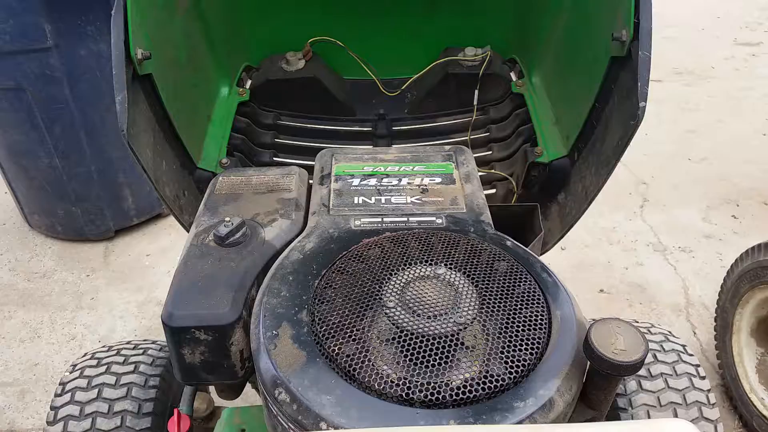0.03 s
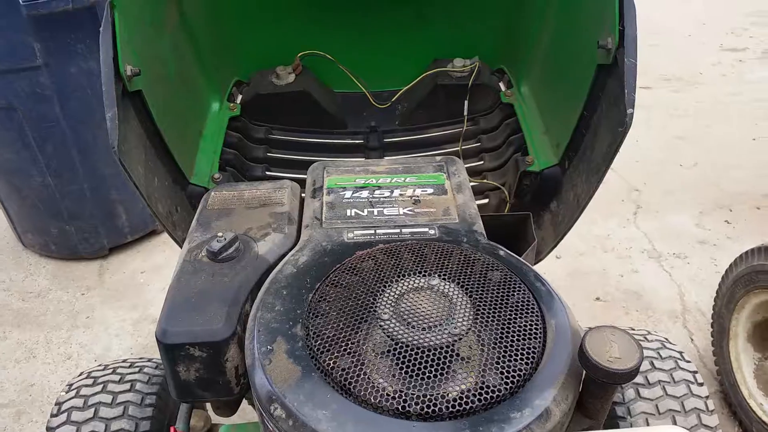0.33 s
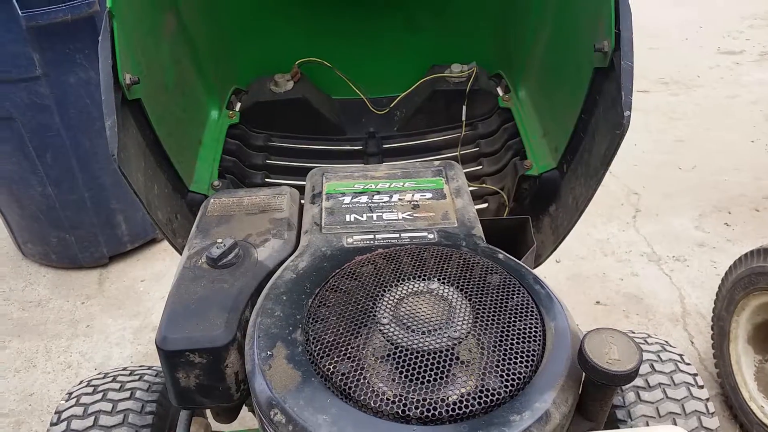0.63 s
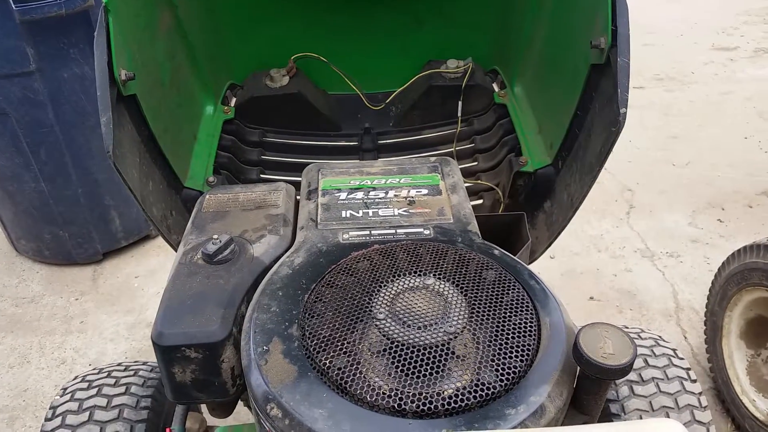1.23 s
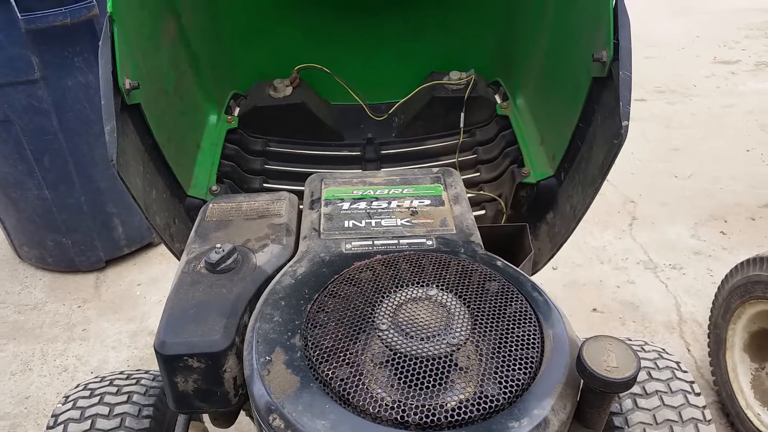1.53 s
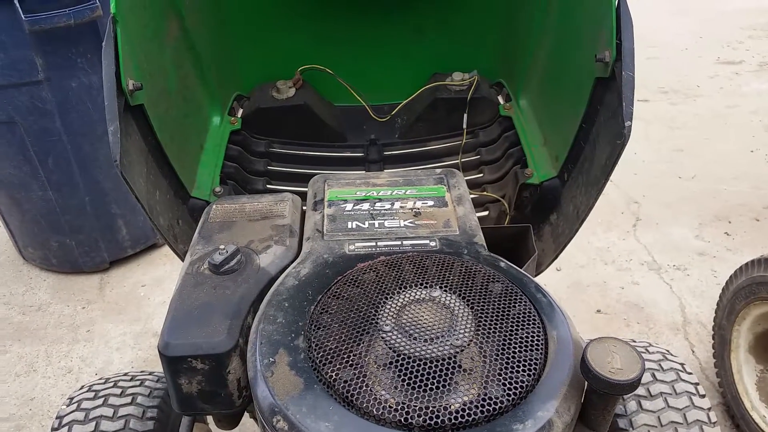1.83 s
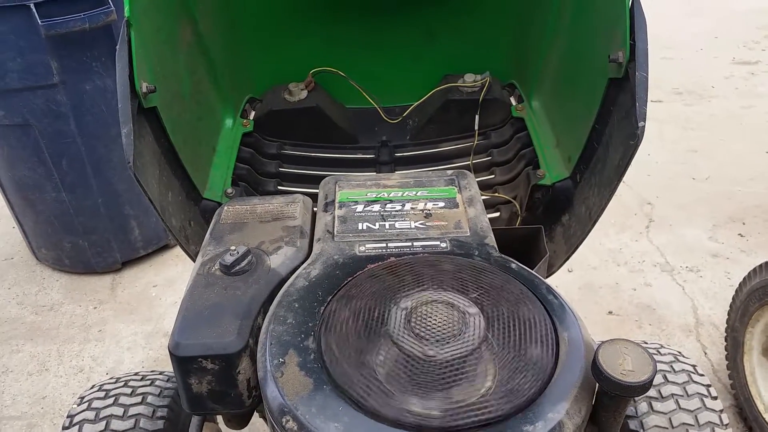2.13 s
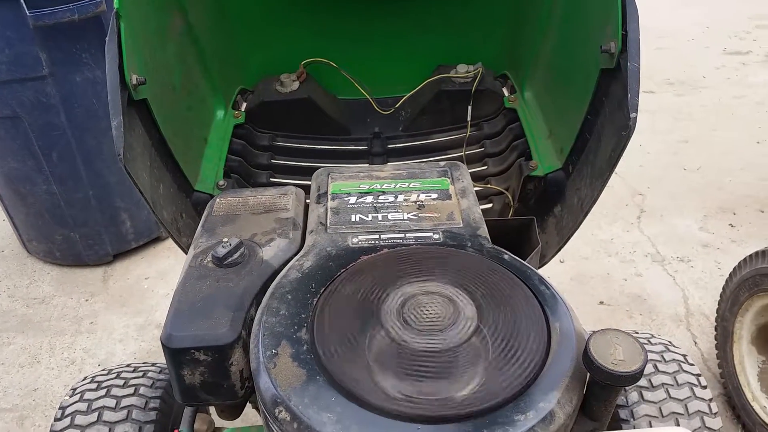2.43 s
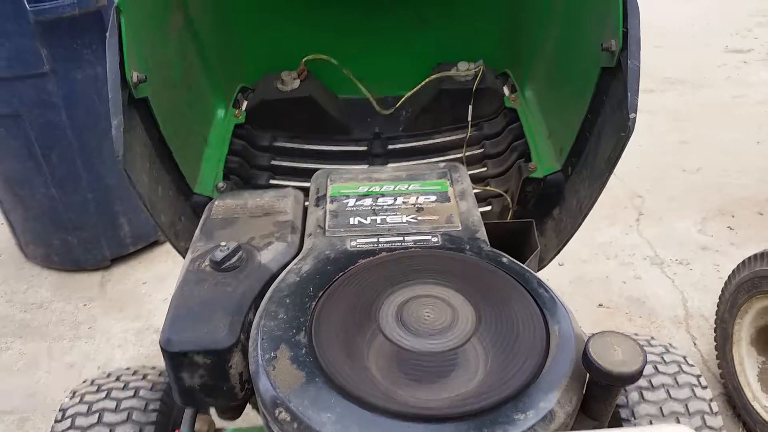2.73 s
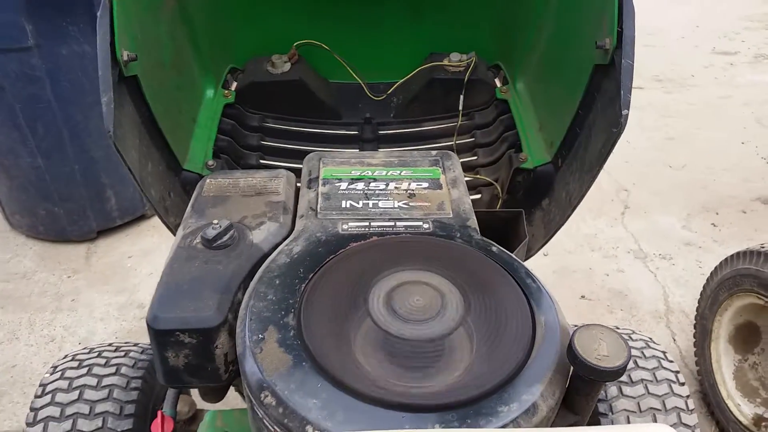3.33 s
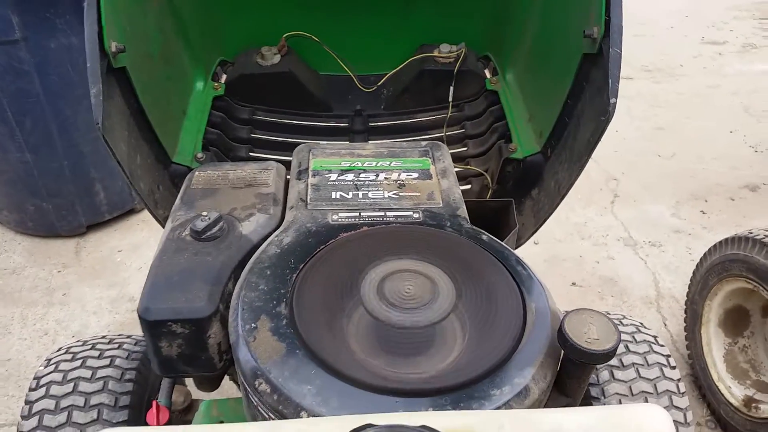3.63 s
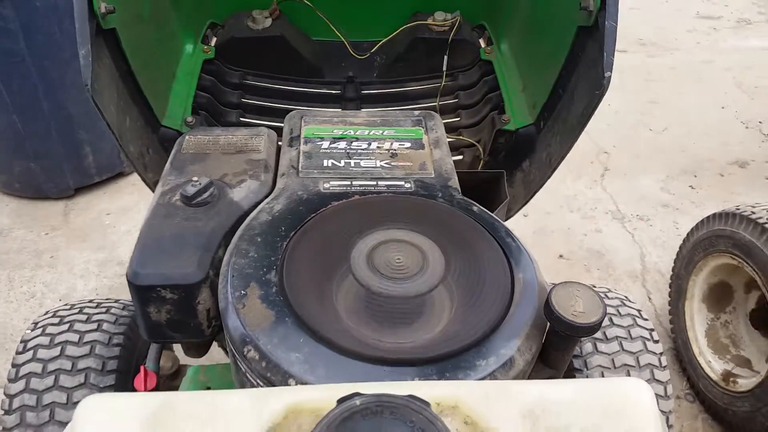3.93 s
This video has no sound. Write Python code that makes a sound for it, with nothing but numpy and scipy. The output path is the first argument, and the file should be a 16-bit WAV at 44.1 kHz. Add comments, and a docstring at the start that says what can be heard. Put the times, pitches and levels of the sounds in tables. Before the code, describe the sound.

A small petrol mower engine starts after a few knocks, then chugs in a garage.

```python
"""A single-cylinder riding mower starts up in a garage, heard from just above the engine.
First the controls knock and rustle over a low rumble. The starter's small gear clunks in, grinds on
the flywheel and squeals as it slips. Then the engine catches, speeds up and settles at about 22 firings
a second. Each firing thumps the muffler, barks and rattles the engine cover; between firings the
engine gulps air and its valves tick. The garage adds a short, dull echo."""
import sys
import numpy as np
from scipy import signal
from scipy.fft import rfft, irfft
from scipy.io import wavfile

SR = 44100
rng = np.random.default_rng(int(sys.argv[2]) if len(sys.argv) > 2 else 0)


def waveform_to_disk(signal):
    """Save audio, clipped to [-1, 1], as 16-bit WAV at the path in sys.argv[1]."""
    frames = np.transpose(np.atleast_2d(signal))
    scaled = np.clip(frames, -1, 1) * 32767
    samples = np.round(scaled).astype(np.int16)
    wavfile.write(sys.argv[1], SR, samples)


N = 176400
TIME = np.arange(N) / SR
FREQ = np.maximum(np.arange(N // 2 + 1) * SR / N, 1)

# A tone colour says how strong low and high sounds are next to each other.
# A ring time is how long a note takes to fade by 60 dB.
# A fade time is how long a hit takes to drop to about a third.
# A half-width is how long a swell takes to drop from its peak to about 60 percent.

# Tone colour of the background rumble. Each row: frequency in Hz, level in dB.
RUMBLE_COLOUR = [(20, -38), (53, 3.5), (107, -2.5), (241, -8), (486, -18), (900, -21), (2090, -27.5),
                 (2600, -35), (3990, -20), (5820, -38), (7220, -37), (8730, -61), (11700, -30.5),
                 (15800, -43)]
# The rumble fading in. Each row: time in seconds, level in dB.
RUMBLE_LEVEL = [(.39, -110), (.425, -63), (.52, -50.5), (.68, -41.5), (2.19, -41.7)]
# How alike noise is on the left and right. Each row: frequency in Hz, likeness from 0 to 1.
STEREO_LIKENESS = [(60, 0.92), (300, 0.82), (700, 0.72), (1400, 0.35), (3000, 0.036), (15000, 0.031)]
# Balance of the two microphones. Each row: frequency in Hz, left minus right in dB.
MIC_LEAN = [(40, -7.5), (100, 1.5), (500, 3), (800, 5.5), (1200, 8), (2000, 13.5), (3400, 15), (5500, 22),
            (7400, 19), (9200, 2), (11800, -16), (15000, -3.5)]

# Knocks of the controls. Each row: start in seconds, level in dB, fade time in seconds.
CONTROL_KNOCKS = [(.655, -44.5, 0.0057), (.739, -24.5, 0.0081), (.961, -33, 0.016), (1.003, -24, 0.016),
                  (1.034, -21, 0.0067), (1.24, -27, 0.0058), (1.377, -35.5, 0.01), (1.402, -40, 0.027),
                  (1.466, -26.5, 0.0082), (1.695, -42, 0.033), (1.725, -28, 0.0055), (1.788, -40.5, 0.047),
                  (1.846, -35, 0.0057)]
# Tone colour of those knocks. Each row: frequency in Hz, level in dB.
KNOCK_COLOUR = [(100, -0.5), (300, -5), (520, -0.5), (750, 1), (1100, -1), (1550, 1.5), (2300, -5.5),
                (3200, -18.5), (5000, -17), (7200, -35), (9000, -62), (12000, -23), (15800, -32)]
# Notes of the control panel. Each row: pitch in Hz, relative level in dB, ring time in seconds.
PANEL_NOTES = [(378, 0, 0.17), (518, 0, 0.14), (1110, -8, 0.045), (1510, 1, 0.031)]
# Notes of a snapping lever. Each row: pitch in Hz, relative level in dB, ring time in seconds.
LEVER_NOTES = [(1220, 1.5, 0.0077), (1570, 2, 0.013), (2130, -5.5, 0.0087)]
# Short scrapes and rustles. Each row: peak time in seconds, level in dB, half-width in seconds.
SCRAPE_SWELLS = [(1.019, -43.5, 0.0057), (1.043, -27, 0.0042), (1.054, -48, 0.037), (1.32, -51.5, 0.026),
                 (1.467, -45.5, 0.0023), (1.566, -48, 0.0062), (1.638, -41.5, 0.012),
                 (1.844, -42.5, 0.0013)]
# Tone colour of the scrapes. Each row: frequency in Hz, level in dB.
SCRAPE_COLOUR = [(1000, -5), (2400, 0), (3400, -3), (5000, 6), (7300, -5.5), (9000, -18.5), (12000, 6.5),
                 (15800, -10)]
# Dull thuds of the frame. Each row: peak time in seconds, level in dB, half-width in seconds.
FRAME_THUDS = [(0.667, -34.5, 0.011), (0.976, -34, 0.0084), (1.314, -37.5, 0.017), (1.477, -36.5, 0.02),
               (1.743, -40.5, 0.03), (1.853, -33.5, 0.0086), (2.709, -26, 0.017), (2.78, -29.5, 0.013)]
# Notes of the frame. Each row: pitch in Hz, relative level in dB, ring time in seconds.
FRAME_NOTES = [(170, -5, 0.05), (278.3, 2, 0.074), (375, -0.5, 0.049), (489, -2.5, 0.039)]
# Booms of the bodywork. Each row: peak time in seconds, level in dB, half-width in seconds, pitch in Hz.
BODY_BOOMS = [(1.023, -24, .006, 520), (1.052, -28, .008, 330), (2.227, -20, .007, 700),
              (2.27, -22, .026, 370), (2.377, -26, .005, 520)]

# The starter's switch closes and its gear slams in.
# Each row: start in seconds, level in dB, fade time in seconds.
CLUNK_HITS = [(2.197, -23.5, 0.0097), (2.21, -12, 0.0071), (2.217, -11.5, 0.011)]
# Tone colour of that clunk. Each row: frequency in Hz, level in dB.
CLUNK_COLOUR = [(59, -49), (100, -7.5), (687, -3.5), (1200, -7), (2160, -5.5), (4070, -7.5), (7220, -16.5),
                (8920, -31), (12500, -8), (15800, -25)]
# Notes of the engine's metal. Each row: pitch in Hz, relative level in dB, ring time in seconds.
METAL_NOTES = [(422.7, -3, 0.13), (450, 0, 0.12), (501, -2, 0.16), (638.4, 0.5, 0.16), (721.5, 1, 0.18),
               (1005, -3.5, 0.36), (1157, 4, 0.1), (1328, 5.5, 0.18), (1562, 8, 0.099), (1645, 4.5, 0.18),
               (2025, -1, 0.1)]
# Loudness of the starter. Each row: time in seconds, overall gear level in dB, rasp level in dB.
STARTER_LEVELS = [(2.205, -60, -70), (2.225, -27.5, -36), (2.295, -20, -29), (2.318, -30, -33),
                  (2.345, -20.5, -33), (2.385, -26, -24), (2.43, -29, -27), (2.55, -28.5, -24),
                  (2.64, -30, -21.5), (2.69, -54, -42)]
# How fast the gear teeth meet. Each row: time in seconds, teeth per second.
TOOTH_SPEED = [(2.2, 225), (2.29, 510), (2.33, 493), (2.42, 625), (2.49, 650), (2.56, 520), (2.7, 830)]
# Tone colour of the grinding gears. Each row: frequency in Hz, level in dB.
GRIND_COLOUR = [(100, -25), (220, -1.5), (400, -3.5), (940, -1), (1650, 3), (1890, 1), (6670, -20.5),
                (8820, -62), (15800, -48)]
# Tone colour of the starter gear's high rasp. Each row: frequency in Hz, level in dB.
RASP_COLOUR = [(2500, -12.5), (4300, -1), (5100, -4.5), (7000, 1), (7900, -15), (10500, -9.5), (12500, -2),
               (13800, -10.5), (15800, -11)]
# The starter's case singing under load.
# Each row: peak time in seconds, level in dB, half-width in seconds, pitch in Hz.
CASE_TONES = [(2.3, -23.5, 0.011, 1653), (2.38, -23, 0.024, 1650), (2.55, -25.5, 0.015, 1616)]
# Notes of the slipping starter gear. Each row: pitch in Hz, relative level in dB, ring time in seconds.
GEAR_NOTES = [(4240, -2, 0.017), (5740, 3, 0.05), (5970, 1, .04), (6400, -1, 0.0087), (12370, 4.5, .025),
              (12090, 2, 0.018)]
# Squeals of that gear. Each row: peak time in seconds, level in dB, pitch in Hz, half-width in seconds.
GEAR_SQUEALS = [(2.356, -16.5, 6100, 0.0037), (2.376, -23, 6950, .004), (2.432, -18, 6020, 0.0028),
                (2.472, -24, 6150, 0.0041), (2.495, -19.5, 5860, 0.0031), (2.55, -22, 5650, 0.0047)]

# Engine speed. Each row: time in seconds, firings per second.
ENGINE_SPEED = [(2.618, 8.77), (2.732, 11.96), (2.816, 14.16), (2.886, 16.42), (2.947, 18.18),
                (3.002, 19.72), (3.101, 21.83), (3.234, 23.45), (3.32, 23.0), (3.408, 22.0), (3.634, 22.15),
                (3.914, 21.72)]
# Strength of the firings. Each row: time in seconds, relative level in dB.
FIRING_STRENGTH = [(2.62, -2.5), (2.74, -1.5), (2.9, 1.5), (3.2, 1), (3.6, -0.5), (4, 0)]
# Weak firings. Each row: time in seconds, change of level in dB.
WEAK_FIRINGS = [(3.454, -3), (3.726, -2), (3.909, -2)]
# Tone colour of the fan and moving parts. Each row: frequency in Hz, level in dB.
FAN_COLOUR = [(150, -5.5), (250, 1.5), (354, -8), (680, -6), (850, -11), (1130, -10.5), (2040, -9),
              (3260, -16), (7240, -16), (9070, -28), (12800, -12.5), (15800, -33)]
# Tone colour of the shaking frame. Each row: frequency in Hz, level in dB.
SHAKE_COLOUR = [(30, -37), (70, 8), (150, 4), (270, -4), (400, -12.5), (1500, -65)]
# Loudness of the fan and the shaking. Each row: time in seconds, level in dB.
CHURN_LOUDNESS = [(2.52, -66), (2.6, -31.5), (2.72, -30.5), (2.9, -24.5), (4, -24)]
# Valve and piston knocks. Each row: fraction of the way to the next firing, relative level in dB.
VALVE_KNOCKS = [(0.168, -1.5), (.42, -5.5), (.7, -5)]
# Loose clacks as the engine catches. Each row: start in seconds, level in dB, fade time in seconds.
LOOSE_CLACKS = [(2.41, -22, 0.0043), (2.596, -23, 0.0084), (2.609, -30, 0.0082), (2.649, -13, 0.0078),
                (2.701, -20.5, 0.016), (2.791, -22, 0.016)]
# Notes of the engine cover. Each row: pitch in Hz, relative level in dB, ring time in seconds.
COVER_NOTES = [(1132, 1.5, 0.046), (1570, 0, 0.046), (2012, 4, 0.042)]
# Tone colour of each firing's blast and of the clatter. Each row: frequency in Hz, level in dB.
BARK_COLOUR = [(180, -42), (300, -10), (380, -5), (711, -7), (850, -14.5), (1130, -7), (1600, -12.5),
               (2050, -7.5), (3320, -14.5), (7250, -11), (8840, -23), (12700, -6.5), (15800, -17)]
# Puffs of air as the starter turns the engine. Each row: start in seconds, level in dB, pitch in Hz.
AIR_PUFFS = [(2.405, -23, 80), (2.56, -28, 150), (2.69, -28, 170)]
# Low notes of the exhaust and muffler. Each row: pitch in Hz, level in dB, rise time in seconds.
MUFFLER_NOTES = [(51, -36, 0.01), (120.8, -13, 0.0062), (259.4, -24, 0.0043)]


def from_db(db):
    """Turn decibels into a number to multiply by."""
    return 10 ** (np.asarray(db) / 20)


def unit_level(x):
    """Scale a signal so its average strength (rms) is 1."""
    return x / np.sqrt(np.mean(x ** 2) + 1e-20)


def curve(rows, at=TIME, column=1):
    """Join the points of a time table with straight lines."""
    rows = np.array(rows)
    return np.interp(at, rows[:, 0], rows[:, column])


def per_hz(points):
    """Fill in a frequency table for every frequency."""
    hz, value = np.transpose(points)
    return np.interp(np.log(FREQ), np.log(hz), value)


def drift(rate_hz):
    """A random wobble of size about 1, mostly slower than rate_hz."""
    return unit_level(irfft(rfft(rng.standard_normal(N)) / (1 + (FREQ / rate_hz) ** 2), N))


def noise(colour, grit_db=0):
    """Stereo noise with a given tone colour; grit_db makes its level flutter quickly."""
    alike = np.clip(per_hz(STEREO_LIKENESS), 0, .995)
    hiss = rng.standard_normal((2, N)) * from_db(grit_db * drift(530))
    mid, side = rfft(hiss) * from_db(per_hz(colour))
    mid = irfft(mid, N)  # what left and right share
    side = irfft(side * np.sqrt((1 - alike) / (1 + alike)), N)
    return np.array([mid + side, mid - side]) / mid.std()


def clicks(times, db):
    """Single clicks at the given times and levels."""
    out = np.zeros(N + SR)
    np.add.at(out, (np.asarray(times) * SR).astype(int), from_db(db))
    return out[:N]


def ring(push, notes):
    """A pushed object rings at its own notes, every second one flipped; the result has strength 1."""
    out = 0
    for k, (hz, db, ring_s) in enumerate(notes):
        fade = np.exp(-np.log(1000) / (ring_s * SR))
        step = 2 * np.pi * hz / SR
        note = signal.lfilter([0, np.sin(step)], [1, -2 * fade * np.cos(step), fade * fade], push + 1e-18)
        out = out + (-1) ** k * from_db(db) * note
    return unit_level(out)


def blows(rows, rise_s=.0008):
    """The loudness outline of hits that jump up and fade away."""
    power = 0
    for start, db, fade_s in rows:
        rise = np.clip((TIME - start) / rise_s, 0, 1) ** 2
        fade = np.exp(-np.clip((TIME - start) / fade_s, 0, 20))
        power = power + (from_db(db) * rise * fade) ** 2
    return np.sqrt(power)


def swell(peak_s, db, half_width_s):
    """The loudness outline of one smooth rise and fall."""
    return from_db(db) * np.exp(-.5 * np.minimum(((TIME - peak_s) / half_width_s) ** 2, 100))


def wavering_tones(rows, wobble, wobble_hz):
    """Short swelling tones whose pitch wanders."""
    clock = np.cumsum(1 + wobble * drift(wobble_hz)) / SR
    return sum(swell(when, db, width) * np.sin(2 * np.pi * hz * clock) for when, db, width, hz in rows)


def thump(hz, rise_s):
    """A low note that swells and dies within a few waves."""
    age = TIME[:SR // 5]
    return (age / rise_s * np.exp(1 - age / rise_s)) ** 1.6 * np.sin(2 * np.pi * hz * age)


def repeat(train, shape):
    """Play a shape at every click."""
    return signal.fftconvolve(train, shape)[:N]


def rumble():
    """A low background rumble fades in and stays."""
    return from_db(curve(RUMBLE_LEVEL)) * noise(RUMBLE_COLOUR)


def garage(sound, ring_s=.19, band_hz=(250, 3500), gain_db=-13):
    """The walls send back a short, dull echo, different on each side."""
    age = TIME[:SR // 2]
    tail = rng.standard_normal((2, len(age))) * np.exp(-np.log(1000) * age / ring_s) * (age > .008)
    tail = tail / np.sqrt(np.sum(tail ** 2, axis=1, keepdims=True))
    tail = signal.sosfilt(signal.butter(2, band_hz, "band", fs=SR, output="sos"), tail)
    return from_db(gain_db) * signal.fftconvolve(sound, tail, axes=1)[:, :N]


def controls(lever_s=.7365, lever_db=-10, panel_db=-14.5):
    """A lever snaps and knocks make the panel ring, with small scrapes in between."""
    hits = blows(CONTROL_KNOCKS)
    snap = ring(clicks([lever_s], 0), LEVER_NOTES)
    panel = from_db(panel_db) * hits.std() * ring(hits * rng.standard_normal(N), PANEL_NOTES)
    scrapes = sum(swell(*row) for row in SCRAPE_SWELLS) * noise(SCRAPE_COLOUR, grit_db=3.5)
    knocks = hits * noise(KNOCK_COLOUR, grit_db=4)
    return knocks + panel + scrapes + from_db(lever_db) * snap / abs(snap).max()


def frame():
    """The frame thuds when the controls are worked and shudders as the engine is turned over."""
    return sum(swell(*row) for row in FRAME_THUDS) * ring(rng.standard_normal(N), FRAME_NOTES)


def bodywork():
    """Hard blows make the bodywork boom briefly, with a rough, unsteady pitch."""
    return wavering_tones(BODY_BOOMS, wobble=.25, wobble_hz=150)


def starter_clunk(ring_db=-44):
    """The starter gear slams in and leaves the engine's metal ringing."""
    slam = blows(CLUNK_HITS) * noise(CLUNK_COLOUR, grit_db=-1)
    return slam + from_db(ring_db) * ring(slam, METAL_NOTES)


def starter_grind(grind_db=-2.5, ring_db=-2, whine_db=-15.5, tooth_spread_db=4, flicker_db=1.8):
    """The starter gear's teeth grind on the engine's heavy flywheel and make the metal ring."""
    teeth_passed = np.cumsum(curve(TOOTH_SPEED) * (1 + .0307 * drift(72))) / SR
    tooth_hits = np.diff(np.floor(teeth_passed), prepend=0) * from_db(tooth_spread_db * drift(370))
    push = unit_level(tooth_hits) + 2.05 * rng.standard_normal((2, N)) + 1.2 * rng.standard_normal(N)
    metal = from_db(ring_db) * ring(push, METAL_NOTES)
    grind = from_db(grind_db) * noise(GRIND_COLOUR, grit_db=-1)
    whine = from_db(whine_db) * np.sin(2 * np.pi * teeth_passed)
    gears = from_db(curve(STARTER_LEVELS)) * (grind + metal + whine)
    rasp_db = curve(STARTER_LEVELS, column=2) + flicker_db * drift(50)
    rasp = from_db(rasp_db) * noise(RASP_COLOUR, grit_db=2)
    switched_on = (TIME > STARTER_LEVELS[0][0]) & (TIME < STARTER_LEVELS[-1][0])
    return (gears + rasp) * switched_on


def starter_case():
    """The starter's case sings on a wavering pitch as the gears strain it."""
    return wavering_tones(CASE_TONES, wobble=.014, wobble_hz=110)


def starter_screech(rough_db=4):
    """The slipping gear rubs unevenly, which keeps its high notes ringing."""
    rubbing = rng.standard_normal((2, N)) * from_db(rough_db * drift(200))
    return swell(peak_s=2.495, db=-22, half_width_s=.075) * ring(rubbing, GEAR_NOTES)


def starter_squeals(octave_db=-4.5, rough_db=3):
    """The gear sticks and slips in short squeals, each a wavering tone plus the octave above."""
    clock = np.cumsum(1 + .022 * drift(600)) / SR
    roughness = unit_level(from_db(rough_db * drift(500)))
    out = 0
    for when, db, hz, width in GEAR_SQUEALS:
        phase = 2 * np.pi * hz * clock
        out = out + swell(when, db, width) * (np.sin(phase) + from_db(octave_db) * np.sin(2 * phase))
    return out * roughness * np.sqrt(2)


def firings(first_s=2.618):
    """When the engine fires, the gap until it fires again, and how strong each firing is in dB."""
    times = [first_s]
    while times[-1] < N / SR:
        times.append(times[-1] + 1 / curve(ENGINE_SPEED, times[-1]))
    times, gaps = np.array(times[:-1]), np.diff(times)
    dips_db = sum(db * (abs(times - when) < gaps / 2) for when, db in WEAK_FIRINGS)
    return times, gaps, curve(FIRING_STRENGTH, times) + dips_db


def churn(shake_db=-6.5):
    """The fan, moving parts and shaking frame grow louder as the engine gets going."""
    level = from_db(curve(CHURN_LOUDNESS)) * (TIME > CHURN_LOUDNESS[0][0])
    return level * (noise(FAN_COLOUR) + from_db(shake_db) * noise(SHAKE_COLOUR))


def clatter(times, gaps, tick_db=-24, ring_db=-41, fade_s=.0044, spread_db=5, jitter_s=.00061):
    """Valves and piston knock in every cycle and ring the metal; loose clacks join as it catches."""
    train = 0
    for fraction, db in VALVE_KNOCKS:
        knock_times = times + fraction * gaps + jitter_s * rng.standard_normal(len(times))
        train = train + clicks(knock_times, db + spread_db * rng.standard_normal(len(times)))
    ticks = repeat(train, np.exp(-TIME[:SR // 10] / fade_s))
    metal = ring(ticks * (rng.standard_normal((2, N)) + rng.standard_normal(N)), METAL_NOTES)
    knocks = (from_db(tick_db) * ticks + blows(LOOSE_CLACKS)) * noise(BARK_COLOUR, grit_db=1.5)
    return knocks + from_db(ring_db) * metal


def engine_cover(times, strength_db, level_db=-36, delay_s=.006, fade_s=.008):
    """Every firing rattles the engine cover for a moment, a little differently each time."""
    rattle = repeat(clicks(times + delay_s, strength_db), np.exp(-TIME[:SR // 10] / fade_s))
    return from_db(level_db) * ring(rattle * rng.standard_normal((2, N)), COVER_NOTES)


def intake(times, gaps, strength_db, fraction=.45, level_db=-25.5):
    """Between two firings the piston draws a hollow gulp of air."""
    gulps = clicks(times + fraction * gaps, strength_db + level_db)
    return repeat(gulps, thump(hz=264.5, rise_s=.0058))


def bark(times, strength_db, level_db=-18.5, delay_s=.0021, rise_s=.0036, hold_s=.0046, fade_s=.0099):
    """Every firing lets out a gritty blast of noise."""
    age = TIME[:SR // 5]
    shape = np.minimum(age / rise_s, 1) * np.exp(-np.maximum(age - rise_s - hold_s, 0) / fade_s)
    train = clicks(times + delay_s, level_db + strength_db + rng.standard_normal(len(times)))
    return repeat(train, shape) * noise(BARK_COLOUR, grit_db=1)


def exhaust(times, strength_db, spread_db=1.3):
    """Squeezed air puffs out as the starter turns; each firing thumps the muffler's low notes."""
    out = sum(repeat(clicks([when], db), thump(hz, rise_s=.0072)) for when, db, hz in AIR_PUFFS)
    for k, (hz, db, rise_s) in enumerate(MUFFLER_NOTES):
        train = clicks(times, strength_db + db + spread_db * rng.standard_normal(len(times)))
        out = out - (-1) ** k * repeat(train, thump(hz, rise_s))  # every second note is flipped
    return out


def scene():
    """Add up the mower, its echo in the garage and the background rumble."""
    times, gaps, strength_db = firings()
    starting = starter_clunk() + starter_grind() + starter_case() + starter_screech() + starter_squeals()
    running = exhaust(times, strength_db) + intake(times, gaps, strength_db) + bark(times, strength_db)
    running = running + engine_cover(times, strength_db) + clatter(times, gaps) + churn()
    mower = controls() + frame() + bodywork() + starting + running
    return mower + garage(mower) + rumble()


def record(dry, half_taps=1024, cutoff_hz=15800):
    """The left microphone favours the middle pitches, the right one the very top and deepest bass."""
    lean = from_db(per_hz(MIC_LEAN))
    gains = np.array([lean, np.ones_like(lean)]) * np.sqrt(2 / (1 + lean ** 2))
    taps = 2 * half_taps + 1
    mics = np.roll(irfft(gains, N), half_taps, axis=1)[:, :taps] * np.hanning(taps)
    heard = np.tanh(signal.fftconvolve(dry, mics, "same", axes=1))  # rounds off loud peaks
    treble_cut = signal.firwin(401, cutoff_hz, fs=SR, window="blackman")
    return signal.fftconvolve(heard, treble_cut[None], "same", axes=1)


dry = scene()
out = record(dry)
waveform_to_disk(out)
```